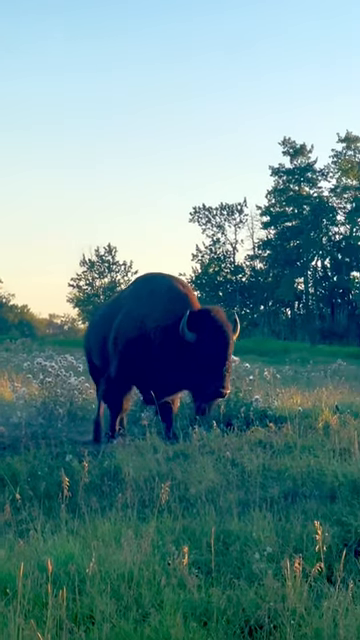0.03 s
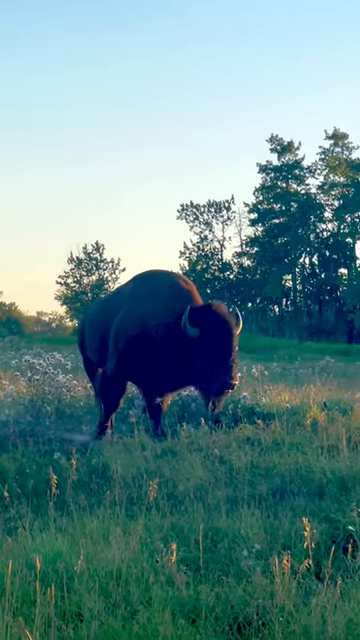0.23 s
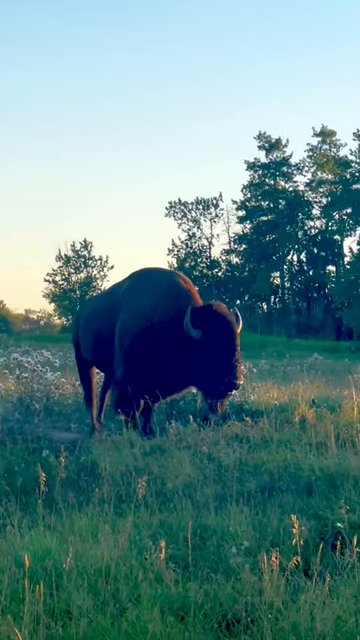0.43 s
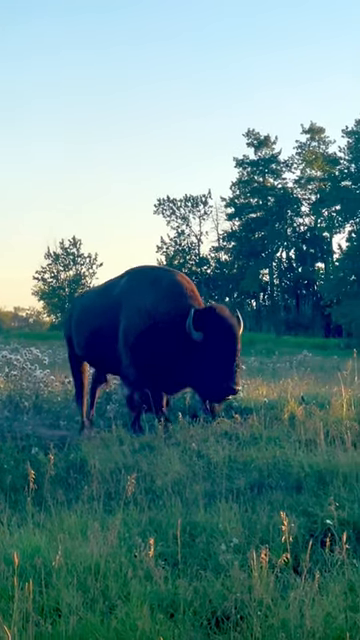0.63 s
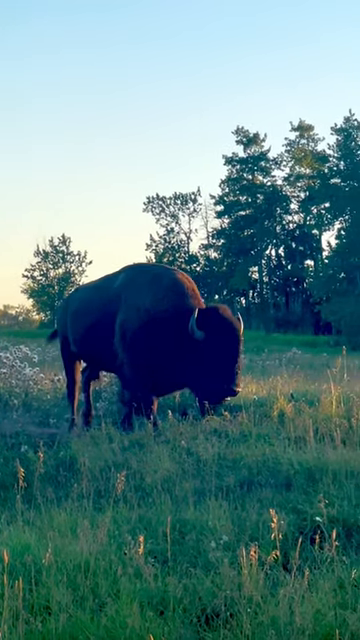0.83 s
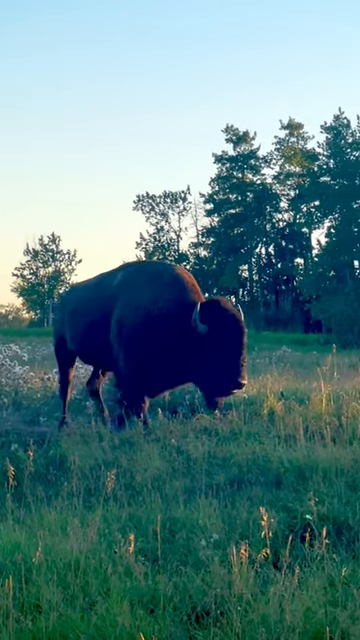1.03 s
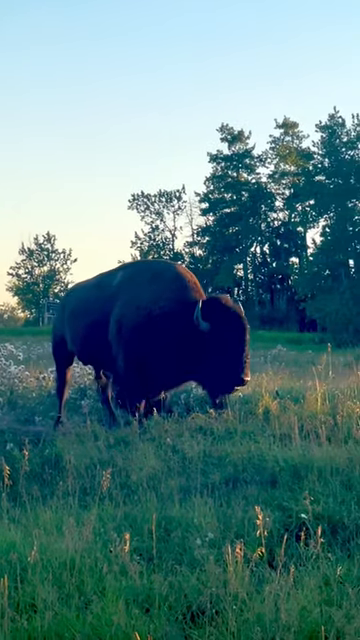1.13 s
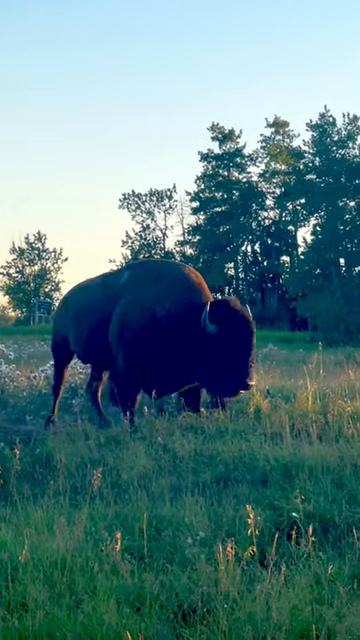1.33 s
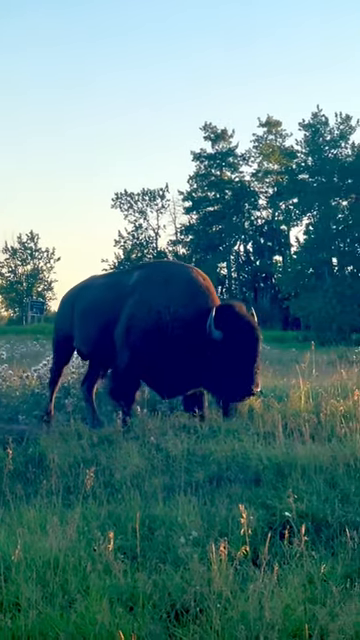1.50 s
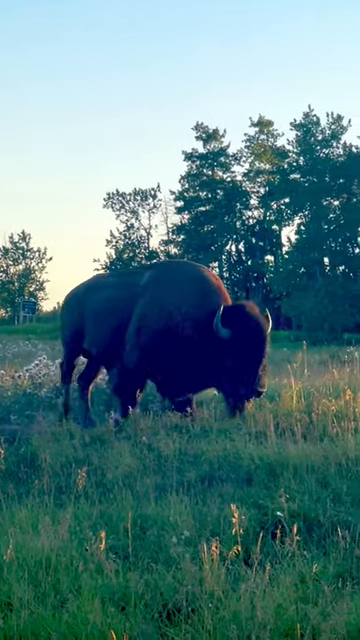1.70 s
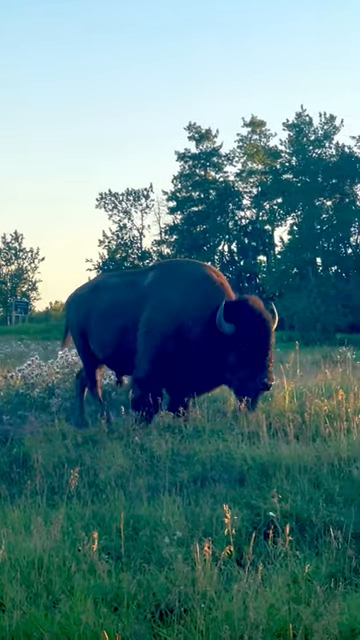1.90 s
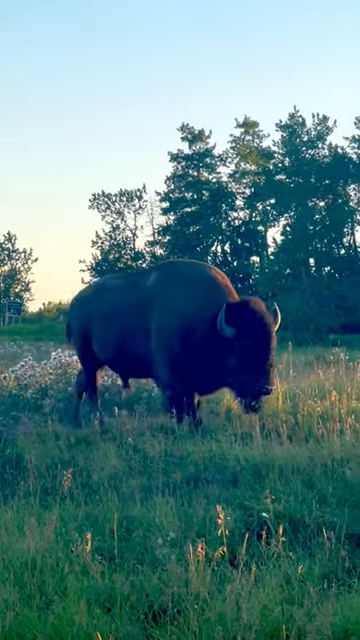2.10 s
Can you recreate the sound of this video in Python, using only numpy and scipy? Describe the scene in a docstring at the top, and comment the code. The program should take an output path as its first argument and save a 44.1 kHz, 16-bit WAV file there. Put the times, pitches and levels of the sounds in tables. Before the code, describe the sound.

Single low, gravelly bison bellow, rattling in rapid throaty beats, then weakening into a quiet meadow

```python
"""Open meadow: a bison bellows once, its vocal folds slapping about 27 times a second, often with a lighter slap between.
Each beat sums decaying sines for the chest boom and the throat clap with a puff of shaped noise; late beats slow and weaken.
The folds' hum is an unsteady sine; growl, rasp, rattle and treble are noise that follows level curves.
Behind it: a distant murmur, a high hiss that swells and fades, and faint pulsing insects, all coloured noise."""
import sys
import numpy as np
from scipy import signal
from scipy.fft import rfft, irfft, next_fast_len
from scipy.io import wavfile
from scipy.ndimage import uniform_filter1d, map_coordinates

SR = 44100
rng = np.random.default_rng(int(sys.argv[2]) if len(sys.argv) > 2 else 0)


def transcribe(u):
    """Save the signal u as a 16-bit wav file named by the first command-line argument.

    u: samples, shape (n,) or (channels, n), limited to [-1, 1]; the rate is SR.
    q: integer samples, one column per channel.
    """
    v = np.clip(np.atleast_2d(u).T, -1, 1)
    q = np.round(v * 32767).astype(np.int16)
    wavfile.write(sys.argv[1], SR, q)


N = 94815

# Colours are noise spectra. Each row: frequency in Hz, relative level in dB.
MURMUR_COLOUR = [(20, -11), (35, 0.5), (55, -0.5), (100, 5), (200, -7), (500, -7), (1000, -16), (1500, -22),
                 (2100, -31), (3000, -40), (7000, -68.5), (13000, -85)]
SIDE_COLOUR = [(30, -24.5), (150, -1), (400, 8), (1000, 3), (1600, -20), (4000, -24), (12000, -58)]
HISS_COLOUR = [(1500, -38.5), (3000, -22.5), (5200, -19), (6200, -25), (8000, -29.5), (9200, -12.5),
               (10500, -4), (11100, -11), (11700, -32.5), (13000, -28)]
INSECT_COLOUR = [(2800, -33), (3600, 0), (4200, 9.5), (5000, -5.5), (6200, -3.5), (7400, 1.5), (8500, -2.5),
                 (12000, -69.5)]
GROWL_COLOUR = [(25, -34.5), (40, -47), (56, -4.5), (85, -13), (125, 1), (170, 2), (235, -4.5),
                (300, -34.5), (600, -52)]
PUFF_COLOUR = [(1200, 5.5), (1900, 0), (2200, -6.5), (2400, 4), (2600, -3), (2800, 4), (3050, -4),
               (3500, 4), (4400, -3), (4900, -4.5), (5300, 0), (5700, -8.5), (6100, -13), (7000, -12.5),
               (8200, -16), (10500, 1), (11600, -13.5), (13000, -54)]
# High hiss. Each row: time in seconds, level in dB.
HISS_LEVEL = [(0, -67.5), (.06, -74.5), (.17, -63), (.23, -69.5), (.37, -60), (.45, -72), (.61, -57.5),
              (.78, -75), (1.15, -74), (1.3, -65), (1.47, -72.5), (1.6, -84.5), (1.78, -80), (1.92, -69.5),
              (1.99, -78), (2.13, -55.5)]
# Low growl under the beats. Each row: time in seconds, level in dB.
GROWL_LEVEL = [(.165, -84), (.19, -48), (.28, -44.5), (.39, -38.5), (.6, -35), (1.0, -36.5), (1.28, -43),
               (1.42, -47), (1.5, -63.5)]
# Air rushing through the throat. Each row: time in seconds, rasp in dB, grainy rattle in dB, treble in dB.
AIR_LEVELS = [(.17, -70, -110, -110), (.22, -62, -99, -97), (.28, -62, -67, -79), (.34, -44, -49.5, -60),
              (.40, -46.5, -47, -54.5), (.50, -49.5, -50, -60), (.60, -57.5, -52, -60),
              (.80, -61, -56, -68.5), (1.05, -53, -65.5, -62), (1.28, -56, -61, -72),
              (1.40, -64, -73.5, -64.5), (1.47, -57, -62, -64.5), (1.55, -74, -75.5, -78.5),
              (1.7, -110, -110, -110)]
# Hum of the folds, near twice the beat rate. Each row: time in seconds, mean pitch in Hz, mean level in dB.
HUM_TRACK = [(.165, 60.7, -76), (.195, 66.2, -46), (.26, 55.6, -53.5), (.305, 61.7, -41), (.42, 55, -57),
             (.52, 54.5, -46), (.62, 52.8, -47.5), (.85, 53.7, -50), (1.0, 55.6, -51), (1.2, 52.8, -45),
             (1.33, 53.8, -51), (1.44, 55, -51), (1.5, 55.3, -73)]
# Main beats. Each row: start in seconds, clap in dB, extra on the clap's upper modes in dB, boom in dB,
# puff in dB; BEAT_TRIM_DB is added to clap, boom and puff.
BEATS = [(0.176, -25.5, 11, -44.5, -86), (0.204, -38.5, -6, -34, -72), (0.287, -21.5, 15, -50, -59),
         (0.319, -13.5, 2, -25.5, -81), (0.348, -42, 0, -28, -55), (0.368, -26, -1, -20.5, -55),
         (0.38, -27.5, 4, -28, -49), (0.402, -47, 3, -18, -47), (0.414, -22.5, -1.5, -47, -45.5),
         (0.432, -29, -2, -27.5, -61), (0.45, -16.5, 0.5, -22.5, -62), (0.485, -18.5, -1, -24, -55),
         (0.521, -26, 2, -24, -55), (0.557, -22.5, -3, -22.5, -47.5), (0.593, -19.5, 2.5, -25, -49),
         (0.629, -21.5, -0.5, -22, -49.5), (0.666, -20, -1, -24.5, -52.5), (0.705, -20, -2, -28.5, -48),
         (0.741, -21.5, 1, -32, -52.5), (0.777, -16, 0.5, -25.5, -53.5), (0.816, -23, -24, -29, -52),
         (0.852, -28, 4, -26, -53), (0.89, -24.5, -3, -26.5, -51.5), (0.929, -19.5, -5, -26, -50.5),
         (0.964, -24.5, -6, -24, -47), (1.002, -37, 11, -25, -46), (1.04, -23, 6, -24.5, -53.5),
         (1.079, -24.5, 3, -25.5, -53), (1.118, -23, 1, -28.5, -54), (1.155, -27.5, 0, -24, -55.5),
         (1.194, -28, -1, -25.5, -55), (1.23, -38.5, 3, -27, -57), (1.272, -29.5, -8, -22, -53),
         (1.315, -38, 7, -28, -60), (1.353, -30.5, -0.5, -24, -54), (1.395, -40.5, 2, -28, -59),
         (1.448, -58, 3, -43, -65.5)]
# Lighter slaps between beats. Each row: start in seconds, base level of clap and boom in dB,
# puff in dB; the slap offsets are added to clap and boom, BEAT_TRIM_DB to the puff.
SLAPS = [(0.466, -37, -74), (0.506, -21, -53), (.576, -18.5, -60), (.612, -23, -73), (.651, -19.5, -63),
         (0.726, -27, -51.5), (0.756, -28, -62.5), (.797, -19, -53.5), (0.835, -23.5, -69),
         (0.878, -29, -55), (1.095, -37, -76), (1.255, -29, -62)]
# Pitch of the boom's main mode; the other chest modes are multiples of it. Each row: time in seconds, pitch in
# Hz.
BOOM_PITCH = [(.18, 164), (.32, 166), (.39, 173), (.46, 204.2), (.61, 205.2), (.75, 199.5), (1.0, 192.9),
              (1.2, 178.6), (1.4, 173.9)]
# The boom dies sooner as the throat slackens. Each row: time in seconds, share of the decay time.
BOOM_RING = [(1.1, 0.99), (1.28, 0.48)]
# Deep modes. Each row: multiple of the boom pitch, mean level in dB, unscaled t60 in seconds, attack in seconds.
CHEST_MODES = [(0.301, -26, 0.21, 0.013), (0.662, -7, 0.11, 0.0093), (0.996, 10, 0.11, 0.01),
               (1.198, -16, 0.1, 0.019)]
# Upper throat modes at mid-call. Each row: mean frequency in Hz, glide in Hz per s, mean level in dB,
# level change in dB per s, unscaled t60 in seconds.
THROAT_MODES = [(489.3, 24.5, -19, 6.5, 0.15), (738, 105.5, -18, -3.5, 0.079), (998, -39, -9.5, 0.5, 0.037),
                (1196.4, 21, -11, 4, 0.035), (1503, 45.5, -13, -2.5, 0.023), (1768, 3, -23.5, 4, 0.029),
                (2040, 3, -33, -20, 0.021), (1120, 6, -0.5, -4.5, 0.012), (1540, -6, -7.5, 8, 0.0099)]
# Band let out by the mouth. Each row: time in seconds, lower edge in Hz, upper edge in Hz.
MOUTH_BAND = [(.18, 374, 1127), (.28, 910, 1190), (.32, 980, 1300), (.36, 585, 2180), (.6, 504, 2220),
              (0.849, 497, 1930), (1.149, 426, 1790), (1.399, 394, 1672)]
# Stereo spread, level. Each row: frequency in Hz, left minus right in dB.
BALANCE_DB = [(200, 0), (350, -.5), (640, -3.3), (1100, -3), (2100, 0), (12000, 0)]
# Stereo spread, phase. Each row: frequency in Hz, lead of the left in radians.
LEAD_RAD = [(20, 0), (100, -.03), (200, -.11), (900, -.33), (1800, 0), (4000, .8), (4570, 1.7), (5100, 4.6),
            (5600, 6.0), (6300, 6.4), (8350, 8.6), (9500, 9.7), (11800, 12.3)]

TOP_HZ = 13000
MURMUR_DB, SIDE_DB = -56, -71.5
INSECT_DB, INSECT_SWING_DB = -83, 6.5
INSECT_START_RATE_HZ, INSECT_SLOWING_HZ_PER_S = 24.3, 0.7
RATTLE_RATE_HZ, RATTLE_LOG_SPREAD = 270, 0.4  # median tick rate, spread of the gaps
RATTLE_SCATTER_DB = 6  # bound on the scatter of tick size, either way
RATTLE_LOW_HZ, RATTLE_HIGH_HZ, RATTLE_TICK_S = 940, 2016, 0.0016
RASP_RING = 1.28
MID_CALL_S = 0.8
OPEN_MOUTH_HZ = 1900  # below this upper edge the half-closed mouth damps the throat's ring
UPPER_MODES_HZ = 1370
BEAT_TRIM_DB, BEAT_RING = -0.5, 0.96
SLAP_CLAP_DB, SLAP_BOOM_DB, SLAP_BRIGHT_DB, SLAP_RING = -3, -9, 5.5, 0.48
PUFF_LEAD_S = 0.0043
PUFF_ATTACK_S, PUFF_T60_S, PUFF_LOG_SPREAD = 0.0073, 0.024, 0.27  # times before each puff's random stretch
REOPEN_S, REOPEN_LEFT = 0.0047, 0.34  # choke time before the next beat, share of the boom left


def amp(db):
    """Amplitude factor of a level in dB."""
    return 10 ** (np.asarray(db) / 20)


def unit(x):
    """Scale to rms 1."""
    return x / np.sqrt(np.mean(x ** 2) + 1e-20)


def along(points, hz):
    """Interpolate (Hz, value) points on a log frequency axis."""
    f, v = np.transpose(points)
    return np.interp(np.log(hz + 1), np.log(f + 1), v)


def curves(rows):
    """One value per sample for each column after the time."""
    s, *cols = np.transpose(rows)
    return [np.interp(np.arange(N) / SR, s, c) for c in cols]


def filtered(x, response):
    """Apply a complex response of frequency to x."""
    m = next_fast_len(N + 8192)
    return irfft(rfft(x, m) * response(np.fft.rfftfreq(m, 1 / SR)), m)[..., :N]


def noise(colour):
    """Coloured noise of rms 1, rolled off steeply above its last point."""
    def response(hz):
        rolloff = 1 + (hz / colour[-1][0] / 2) ** 4
        return amp(along(colour, hz)) / rolloff
    return unit(filtered(rng.standard_normal(N), response))


def band(x, low_hz, high_hz, order):
    """Gentle high-pass, then steep low-pass."""
    x = signal.sosfilt(signal.butter(2, low_hz, "high", fs=SR, output="sos"), x)
    return signal.sosfilt(signal.butter(order, high_hz, fs=SR, output="sos"), x)


def patchy(x, depth_db):
    """Random gain patches in time and frequency, so that puffs differ in colour."""
    z = signal.stft(x, nperseg=512)[2]
    field = uniform_filter1d(rng.standard_normal(z.shape), size=5, axis=0)
    field = uniform_filter1d(field, size=5, axis=1)
    gain = amp(depth_db * unit(field))
    return unit(signal.istft(z * gain, nperseg=512)[1][:N])


def wobble(rate_hz):
    """Smooth curve through random points at rate_hz."""
    return map_coordinates(rng.standard_normal(SR // 10), [np.arange(N) * rate_hz / SR])


def add(track, s, sound):
    """Mix a sound into the track at s seconds."""
    part = track[max(round(s * SR), 0):][:len(sound)]
    part += sound[:len(part)]


def meadow():
    """Steady distant murmur plus a high hiss that swells and fades, both coloured noise."""
    hiss_db, = curves(HISS_LEVEL)
    return amp(MURMUR_DB) * noise(MURMUR_COLOUR) + amp(hiss_db) * noise(HISS_COLOUR)


def insects():
    """Insect song: noise whose dB level swings as a cosine at a slowly falling rate."""
    rate_hz = INSECT_START_RATE_HZ - INSECT_SLOWING_HZ_PER_S * np.arange(N) / SR
    swing = np.cos(2 * np.pi * np.cumsum(rate_hz) / SR)
    return amp(INSECT_DB + INSECT_SWING_DB * swing) * noise(INSECT_COLOUR)


def rattle(count=900):
    """Loose tissue ticks quickly and unevenly: decaying noise bursts in a narrow band."""
    gaps, sizes = rng.standard_normal((count, 2)).T
    gaps_s = np.exp(RATTLE_LOG_SPREAD * gaps) / RATTLE_RATE_HZ
    at = (SR * np.cumsum(gaps_s)).astype(int)
    ticks = np.bincount(at, amp(RATTLE_SCATTER_DB * np.tanh(sizes)), N)[:N]
    bursts = signal.lfilter([1], [1, -np.exp(-1 / (RATTLE_TICK_S * SR))], ticks)
    return unit(band(bursts * rng.standard_normal(N), RATTLE_LOW_HZ, RATTLE_HIGH_HZ, order=12))


def rasp(air_gain, count=8):
    """Air noise rings the throat; crossfaded clap responses follow its changing shape."""
    moments_s = np.linspace(AIR_LEVELS[4][0], BEATS[-1][0], count)
    t = np.arange(N) / SR
    total = np.zeros(N)
    for s, share in zip(moments_s, np.eye(count)):
        air = air_gain * rng.standard_normal(N)
        rung = unit(signal.fftconvolve(air, clap(s, RASP_RING, 0))[:N])
        total += np.sqrt(np.interp(t, moments_s, share)) * rung
    return total


def throat_air(flutter_db=4.0, flutter_hz=220):
    """Fluttering air rasps and hisses, loose tissue rattles, a low growl runs under the beats."""
    rasp_db, rattle_db, treble_db = curves(AIR_LEVELS)
    growl_db, = curves(GROWL_LEVEL)
    flutter = unit(amp(flutter_db * wobble(flutter_hz)))
    treble = flutter * patchy(noise(PUFF_COLOUR), depth_db=4.0)
    air = amp(rasp_db) * rasp(flutter) + amp(rattle_db) * rattle() + amp(treble_db) * treble
    return air + amp(growl_db) * noise(GROWL_COLOUR)


def tone(pitch_hz, waver, waver_hz=45):
    """Sine on a randomly unsteady pitch."""
    return np.sin(2 * np.pi * np.cumsum(pitch_hz * (1 + waver * wobble(waver_hz))) / SR)


def hum(waver=0.069, waver_db=1):
    """Deep hum of the folds, near twice the beat rate: a sine unsteady in pitch and level."""
    pitch_hz, level_db = curves(HUM_TRACK)
    return amp(level_db + waver_db * wobble(27)) * np.sqrt(2) * tone(pitch_hz, waver)


def puff():
    """Envelope of one puff of air: swell and decay, randomly stretched, peak 1."""
    t = np.arange(SR // 10) / SR / np.exp(PUFF_LOG_SPREAD * rng.standard_normal())
    shape = (1 - np.exp(-(t / PUFF_ATTACK_S) ** 2)) * amp(-60 * t / PUFF_T60_S)
    return shape / shape.max()


def boom(s, gap_s, scatter_db=1):
    """Chest ring of one beat: swelling, decaying sines choked as the folds reopen before gap_s."""
    t = np.arange(SR // 5) / SR
    pitch_hz = np.interp(s, *np.transpose(BOOM_PITCH))
    ring = np.interp(s, *np.transpose(BOOM_RING))
    choke = np.interp(t, [gap_s - REOPEN_S, gap_s], [1, REOPEN_LEFT])
    total = np.zeros(len(t))
    for multiple, db, t60_s, attack_s in CHEST_MODES:
        level_db = db + scatter_db * rng.standard_normal()
        envelope = amp(level_db - 60 * t / (t60_s * ring)) * (1 - np.exp(-t / attack_s))
        total += envelope * np.sin(2 * np.pi * multiple * pitch_hz * t)
    return choke * total


def clap(s, ring, bright_db, scatter_db=2.5, attack_s=0.0012, detune=0.008):
    """Throat's answer to a slap: decaying modes through the mouth band; ring scales the decays."""
    t = np.arange(SR // 6) / SR
    late_s = s - MID_CALL_S
    times_s, lows_hz, highs_hz = np.transpose(MOUTH_BAND)
    low_hz = np.interp(s, times_s, lows_hz)
    high_hz = np.interp(s, times_s, highs_hz)
    ring = ring * min(1, high_hz / OPEN_MOUTH_HZ)
    modes = np.zeros(len(t))
    for hz, glide, db, change, t60_s in THROAT_MODES:
        level_db = db + change * late_s + bright_db * (hz > UPPER_MODES_HZ)
        level_db += scatter_db * rng.standard_normal()
        mode_hz = (hz + glide * late_s) * (1 + detune * rng.standard_normal())
        modes += amp(level_db - 60 * t / (t60_s * ring)) * np.sin(2 * np.pi * mode_hz * t)
    return band(modes * (1 - np.exp(-t / attack_s)), low_hz, high_hz, order=9)


def folds():
    """Every beat and slap booms, claps and lets out a puff that starts slightly ahead."""
    voice, flow = np.zeros(N), np.zeros(N)
    starts_s = np.array([row[0] for row in BEATS] + [N / SR])

    def gap_s(s):
        """Time to the next main beat, or to the end after the last."""
        return starts_s[starts_s > s].min() - s

    for s, clap_db, bright_db, boom_db, puff_db in BEATS:
        add(voice, s, amp(boom_db + BEAT_TRIM_DB) * boom(s, gap_s(s)))
        add(voice, s, amp(clap_db + BEAT_TRIM_DB) * clap(s, BEAT_RING, bright_db))
        add(flow, s - PUFF_LEAD_S, amp(puff_db + BEAT_TRIM_DB) * puff())
    for s, slap_db, puff_db in SLAPS:
        add(voice, s, amp(slap_db + SLAP_BOOM_DB) * boom(s, gap_s(s)))
        add(voice, s, amp(slap_db + SLAP_CLAP_DB) * clap(s, SLAP_RING, SLAP_BRIGHT_DB))
        add(flow, s - PUFF_LEAD_S, amp(puff_db + BEAT_TRIM_DB) * puff())
    return voice + flow * patchy(noise(PUFF_COLOUR), depth_db=5)


def scene():
    """All sources in front; opposite-sign noise on the two sides adds a little width."""
    front = meadow() + insects() + throat_air() + hum() + folds()
    side = amp(SIDE_DB) * noise(SIDE_COLOUR)
    return np.array([front + side, front - side])


def record(dry):
    """Stereo spread: left and right differ in level and phase by frequency, cut off at TOP_HZ."""
    half = np.array([[0.5], [-0.5]])

    def response(hz):
        level = amp(half * along(BALANCE_DB, hz))
        phase = np.exp(1j * half * along(LEAD_RAD, hz))
        return level * phase * (hz < TOP_HZ)
    return filtered(dry, response)


dry = scene()
out = record(dry)
transcribe(out)
```